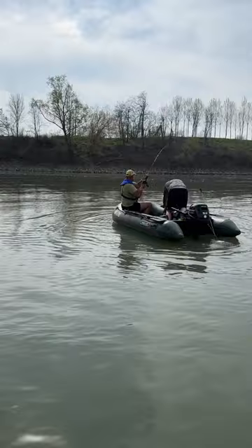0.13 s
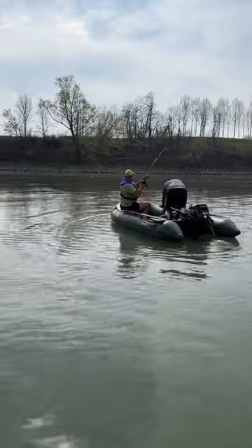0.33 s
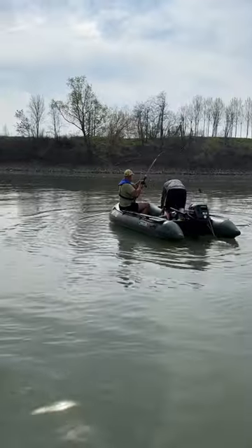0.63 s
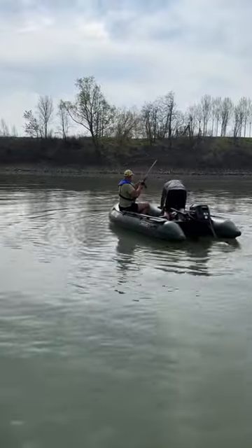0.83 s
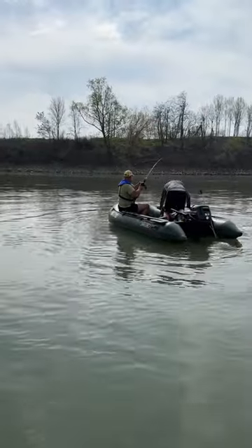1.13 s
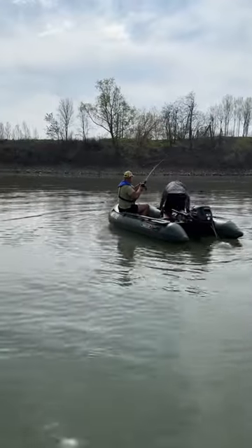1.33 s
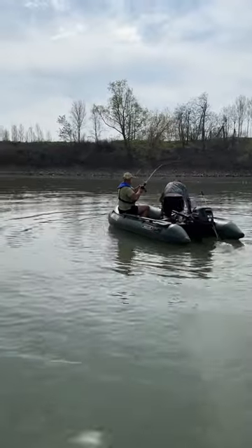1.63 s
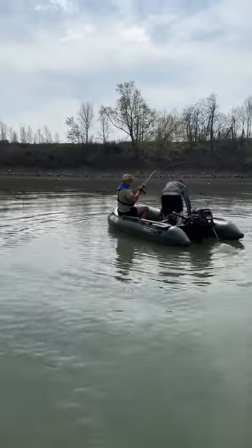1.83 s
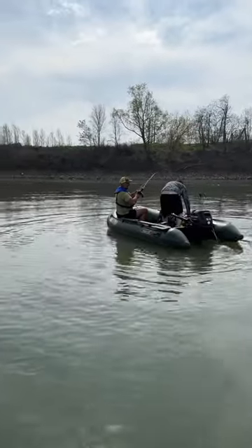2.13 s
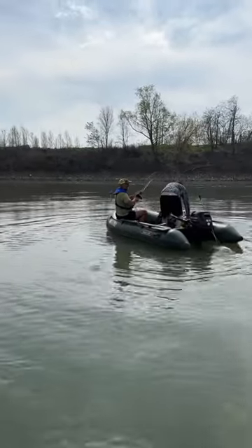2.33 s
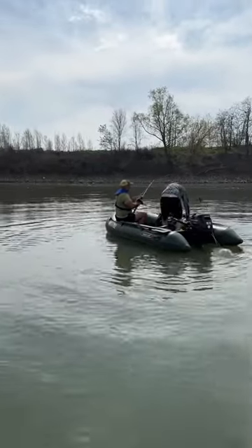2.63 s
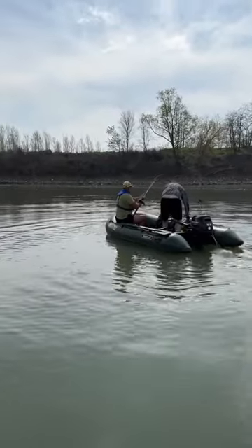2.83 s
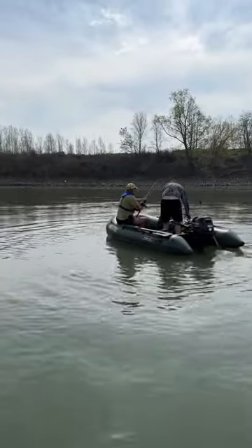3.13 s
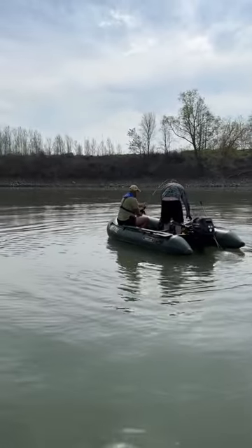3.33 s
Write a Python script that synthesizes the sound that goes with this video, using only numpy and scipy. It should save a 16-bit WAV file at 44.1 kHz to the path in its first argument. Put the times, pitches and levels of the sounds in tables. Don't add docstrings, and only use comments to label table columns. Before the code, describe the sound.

Steady puttering of an outboard engine on an open river, heard by a handheld camera's stereo microphone, with loose parts pinging, tiny drips and fizz, soft low wind puffs, and a single hard knock past midway.

```python
import sys
import numpy as np
from scipy import signal
from scipy.fft import rfft, irfft
from scipy.io import wavfile
from scipy.ndimage import uniform_filter1d

SR = 44100
rng = np.random.default_rng(int(sys.argv[2]) if len(sys.argv) > 2 else 0)


def store_wav(level_fs):
    pcm = np.round(np.clip(np.atleast_2d(level_fs), -1, 1) * 32767)
    wavfile.write(sys.argv[1], SR, pcm.T.astype(np.int16))


def voltage_ratio(level):
    return 10 ** (np.asarray(level, float) / 20)


N = 153027


def evened(x):
    return x / np.sqrt(np.mean(x ** 2) + 1e-20)


def read(points, hz):
    f, value = np.transpose(points)
    return np.interp(np.log(hz + 1), np.log(f + 1), value)


def over_time(points):
    return np.interp(np.arange(N) / SR, *np.transpose(points))


def coloured(x, points):
    n = x.shape[-1]
    return irfft(rfft(x) * voltage_ratio(read(points, np.fft.rfftfreq(n, 1 / SR))), n)


def drift(per_s):
    t = np.arange(0, N, 64) / SR
    f = np.geomspace(per_s / 12, per_s, num=24)[:, None]
    waves = np.sin(2 * np.pi * (f * t + rng.random(f.shape))) / np.sqrt(f)
    return np.interp(np.arange(N) / SR, t, evened(waves.sum(0)))


def ring(x, hz, width_hz):
    r = np.exp(-np.pi * width_hz / SR)
    return signal.lfilter([1, 0, -r], [1, -2 * r * np.cos(2 * np.pi * hz / SR), r * r], x)


def ring_twice(x, hz, width_hz):
    return evened(ring(ring(x, hz, width_hz), hz, width_hz))


def add(mix, s, sound):
    part = mix[round(s * SR):][:len(sound)]
    part += sound[:len(part)]


def turning(table, multiple=1):
    s, speed, db = np.transpose(table)
    t = np.arange(N) / SR
    return np.cumsum(np.interp(t, s, speed)) / SR / multiple, voltage_ratio(np.interp(t, s, db))


# (time [s], firings [per s], level [dB])
THUMP = [(0.0, 25.67, -1.4), (0.2, 25.22, -1.5), (0.4, 25.05, 0.2), (0.65, 25.28, 1.2), (0.9, 24.84, -0.3),
         (1.05, 25.13, 0.4), (1.2, 25.74, -0.2), (1.4, 25.23, 0.5), (1.65, 25.4, 0.3), (1.9, 24.72, -0.0),
         (2.1, 24.3, -0.1), (2.3, 24.51, 0.3), (2.55, 24.58, -0.4), (2.75, 24.47, -0.4),
         (2.95, 24.21, -1.4), (3.2, 24.1, -0.3), (3.47, 24.07, 1.4)]
# (multiple of the firing rate, level [dB rms])
THUMP_ORDERS = [(2, -40.5), (3, -33.5), (4, -37.5), (5, -47), (6, -48.5)]


def exhaust():
    pipe_hz, pipe_width_hz, idle_hz = 78, 110, 27
    turns, gain = turning(THUMP)
    turns = turns + 0.75 + 0.004 * drift(9)
    thump = 0
    for k, db in THUMP_ORDERS:
        lag = -0.2 - 2 * np.arctan((k * idle_hz - pipe_hz) / (pipe_width_hz / 2))
        lag += 3.6 * (k > 4.5)
        level = np.sqrt(2) * voltage_ratio(db + 0.9 * drift(6.5))
        thump = thump + level * np.cos(2 * np.pi * round(k) * turns - lag)
    return gain * thump


# (time [s], pitch of its 24th multiple [Hz], level [dB])
SHAFT = [(0.0, 812.4, 3), (0.11, 818.2, -0.5), (0.45, 815.3, -0.5), (0.77, 826.9, 0.5), (0.94, 815.1, 0),
         (1.54, 817.6, 0), (1.7, 827.9, 1.5), (2.02, 811.4, 0), (2.08, 818.3, 0.5), (2.17, 807.4, -1),
         (2.77, 830.7, 0), (3.28, 823.5, -0.5), (3.39, 827.7, 0), (3.47, 816.5, -0.5)]
WHINE_MULTIPLE = 24
# (multiple of the shaft speed, level [dB rms])
SHAFT_ORDERS = [(2, -46.5), (2.5, -49), (3, -51), (4, -54.5), (5, -49), (6, -51), (7, -56), (8, -54),
                (8.5, -55.5), (9, -47), (9.5, -53.5), (10, -54.5), (11, -55), (12, -55.5), (13, -62.5),
                (16, -50), (17, -58.5), (24, -53), (28.5, -63.5), (32, -54), (35, -60), (38.5, -60)]


def whine():
    turns, gain = turning(SHAFT, WHINE_MULTIPLE)
    tones = 0
    for k, db in SHAFT_ORDERS:
        level = np.sqrt(2) * voltage_ratio(db + 1.3 * drift(12))
        phase = 2 * np.pi * (round(2 * k) / 2 * turns + rng.random()) + 0.22 * drift(10)
        tones = tones + level * np.cos(phase)
    return gain * tones


def strokes():
    turns = turning(SHAFT, WHINE_MULTIPLE)[0] + 0.36
    puff = np.exp(-(turns % 1) / 0.43) * np.where(turns % 2 < 1, 1, 0.67)
    return uniform_filter1d(puff, size=450)


# (pitch [Hz], width [Hz], level [dB rms])
COWL = [(300.7, 66, -50), (427, 41, -52.5), (559.7, 56, -53.5), (746, 74, -52), (1004, 83, -54),
        (1063, 70, -55), (1157, 71, -55), (1685, 120, -59.5), (2067, 41, -63), (3115, 28, -65),
        (4480, 990, -63.5), (6220, 150, -61.5), (7440, 820, -60.5)]
# (time [s], level [dB])
SINGING = [(0, 4), (.85, 1), (1.1, -3), (1.55, -2.5), (1.8, -2), (2.25, -4), (2.4, 3), (3.47, -1)]
# (frequency [Hz], level [dB per Hz])
ROAR = [(40, -5.5), (130, -2), (500, -9), (1400, -16), (3500, -21), (5200, -29), (9500, -23),
        (16000, -30.5)]


def block():
    pressure = strokes()
    noise = rng.standard_normal((2, N)) * (1 + 0.68 * pressure / pressure.mean())
    cowl = sum(voltage_ratio(db + drift(4.95)) * ring_twice(noise[0], hz, 1.4 * width) for hz, width, db in COWL)
    cowl = cowl + voltage_ratio(-55 + over_time(SINGING)) * ring_twice(noise[0], 2236, 47)
    roar = voltage_ratio(-42.5 + 0.71 * drift(4.3)) * evened(coloured(noise[1], ROAR))
    return turning(SHAFT)[1] * cowl + roar


RATTLE_START = 0.64
# (time [s], level [dB])
CHUG_LEVEL = [(0, 0.5), (1.7, 1), (1.9, 3), (2.1, -1), (2.35, -3.5), (2.5, 3), (2.75, 2.5), (2.9, 0),
              (3.47, 0.5)]


def chug():
    turns = 2 * (turning(SHAFT, 2 * WHINE_MULTIPLE)[0] + RATTLE_START - 0.07)
    u = turns % 1
    strong = turns % 2 < 1
    later = np.tanh((np.arange(N) / SR - 1.6) / 0.3)
    phase = 32 * (turns + 0.1 * u * (1 - u) - 0.03 * u * strong)
    db = np.where(strong, 3 * later, -8 * (1 + later) / 2) + over_time(CHUG_LEVEL)
    level = 2 * voltage_ratio(-50 + db + 0.79 * drift(14)) * np.sqrt(np.sin(np.pi * u))
    return level * np.cos(2 * np.pi * phase + 0.5 * drift(20))


# (pitch [Hz], width [Hz], level [dB rms], delay [cycles])
RATTLE = [(1697, 50, -66.5, .4), (3147, 62, -65, 0.508), (3545, 100, -71.5, .45), (4360, 970, -63.5, .6),
          (2840, 95, -69.5, .45)]


def rattle():
    turns = turning(SHAFT, 2 * WHINE_MULTIPLE)[0] + RATTLE_START
    force = voltage_ratio(1.5 * drift(15))
    scrapes = np.hanning(800) * rng.standard_normal((len(RATTLE), 800))
    out = np.zeros(N)
    for (hz, width, db, delay), scrape in zip(RATTLE, scrapes):
        cycle = np.floor(turns - delay)
        hits = np.diff(cycle, prepend=cycle[0]) * force
        taps = signal.oaconvolve(hits, scrape)[:N]
        out += voltage_ratio(db) * ring_twice(taps, hz, 1.2 * width)
    return out


# (time [s], level [dB], pitch [Hz])
BEADS = [(0.0538, -39.5, 2240), (0.1301, -46, 2215), (0.172, -39, 2230), (0.2229, -43.5, 2250),
         (0.2828, -50, 2240), (0.3576, -54, 2180), (0.4095, -50, 2234), (0.5162, -45, 2244),
         (0.6125, -44, 2206), (0.6579, -40.5, 2205), (0.7262, -42, 2240), (0.7746, -40.5, 2186),
         (0.9378, -54, 2250), (1.045, -52, 2210), (1.1169, -47, 2220), (1.2426, -41.5, 2244),
         (1.2925, -51, 2230), (1.3598, -44, 2250), (1.4102, -53, 2170), (1.475, -39, 2240),
         (1.5279, -56, 2290), (1.5913, -43, 2230), (1.6232, -44, 2260), (1.6576, -39.5, 2215),
         (2.3493, -45, 2236), (2.4341, -40.5, 2226), (2.467, -50, 2245), (2.5882, -44, 2260),
              (2.6546, -43, 2253), (2.7678, -45.5, 2240), (2.8257, -58, 2170), (2.8826, -57, 2240),
              (3.0018, -52, 2230), (3.0517, -53, 2240), (3.116, -43.5, 2205), (3.1544, -45, 2297),
              (3.2906, -55, 2200), (3.4084, -45, 2300)]


def beads():
    length_s = 0.041
    out, t = np.zeros(N), np.arange(0, length_s, 1 / SR)
    swell = np.sin(np.pi * (t / length_s) ** 0.42) ** 2
    for s, db, hz in BEADS:
        add(out, s - 0.006, voltage_ratio(db - 2.5) * swell * np.sin(2 * np.pi * hz * t))
    return out


# (frequency [Hz], level [dB per Hz])
KNOCK = [(400, -25), (1000, 0), (1500, -4), (2500, -2), (4200, 2), (6500, -3), (10000, -15), (16000, -21)]
# (pitch [Hz], level [dB], time to fall 60 dB [s])
HULL = [(1450, -5, 0.04), (2300, 2, 0.057), (2490, -1, 0.07), (2780, -3.5, .06), (3360, 2, .08),
        (4310, -1.5, 0.08)]


def knock():
    out, t = np.zeros(N), np.arange(5000) / SR
    crack = voltage_ratio(-60 * np.maximum(t - 0.0037, 0) / 0.0093)
    tail = voltage_ratio(-5 - 60 * t / 0.11)
    blow = rng.standard_normal(5000) * np.minimum(t / 0.00071, 1) * (crack + tail)
    modes = sum(voltage_ratio(db - 60 * t / t60) * np.sin(2 * np.pi * hz * t) for hz, db, t60 in HULL)
    ringing = voltage_ratio(-10) * modes * np.minimum(t / 0.0019, 1)
    add(out, 2.0375, voltage_ratio(-27.5) * (coloured(blow, KNOCK) * 1.47 + ringing))
    return out


# (time [s], level [dB], pitch [Hz])
TICKS = [
    (0.161, -35, 4480),
    (0.945, -32.5, 8200),
    (1.7376, -31, 4660),
    (2.2403, -36.5, 7500),
    (2.566, -38.5, 7340),
    (2.829, -38, 4100),
    (2.9576, -33, 7470),
    (3.0025, -32, 4570),
    (3.041, -40, 7860),
         (.345, -39, 10480),
    (0.567, -32, 10000),
    (.636, -35.5, 9400),
    (1.05, -27.5, 11100),
    (1.3818, -28, 10770),
    (1.454, -35, 11100),
    (1.592, -36, 9400),
    (1.738, -31, 9250),
         (.064, -45, 7510), (.272, -48, 6280), (.707, -47, 6580), (1.05, -46, 6260), (1.117, -40, 7010),
          (1.199, -37, 7900), (1.288, -38, 4610), (1.381, -34.5, 6270), (1.591, -35, 6300),
          (2.305, -40, 7010), (2.694, -42, 4680), (3.166, -42, 7160), (3.258, -41, 6210)]
# (time [s], level [dB], pitch [Hz])
PLOPS = [
    (0.358, -43, 1220),
    (0.779, -31, 2230),
    (1.6197, -41, 1290),
    (2.9045, -30, 1200),
    (3.0196, -31, 2330),
    (3.1567, -29, 2354),
    (3.3966, -44, 1220),
]


def drops():
    out, t = np.zeros(N), np.arange(900) / SR
    ticks = TICKS
    for (s, db, hz), noise in zip(ticks, rng.standard_normal((len(ticks), 900))):
        spray = noise * np.minimum(t / 0.00046, 1) * np.exp(-t / 0.0036)
        hiss = evened(np.diff(spray, n=2, prepend=[0, 0]))
        burst = evened(ring(spray, hz, 0.12 * hz)) + 0.19 * hiss
        add(out, s, voltage_ratio(db - 0.2) * burst / abs(burst).max())
    fade = np.minimum(t / 0.00083, 1) * np.exp(-t / 0.0058)
    for s, db, hz in PLOPS:
        add(out, s, voltage_ratio(db - 6.5) * np.sin(2 * np.pi * hz * t * (1 + 9 * t)) * fade)
    return out


def fizz():
    size = voltage_ratio(3.45 * np.minimum(rng.exponential(1, N), 4)) * (rng.random(N) < 900 / SR)
    kind, out = rng.integers(0, 24, N), np.zeros(N)
    for k, hz in enumerate(np.geomspace(1500, 14000, num=24)):
        u = np.arange(0, 8, hz / SR)
        chirp = np.sin(2 * np.pi * u * (1 + 0.024 * u)) * u * np.exp(-u / 1.73)
        out += signal.oaconvolve(size * (kind == k), chirp)[:N]
    return voltage_ratio(-54.5) * evened(out)


# (time [s], level [dB])
GUSTS = [(.27, -5), (.71, 5), (.87, 5), (1.07, 6), (1.63, 10), (1.95, 4), (2.05, 8), (2.35, 2), (2.5, 10),
         (2.72, 8.5), (2.85, 3), (3.12, 7), (3.38, 4)]
# (frequency [Hz], level [dB per Hz])
WIND = [(25, -24), (60, 6), (110, 2), (170, -7), (260, -14), (600, -54)]


def wind():
    t = np.arange(N) / SR
    puffs = coloured(rng.standard_normal((2, N)), WIND)
    gusts = 1 + sum(voltage_ratio(db + 3.5) * np.exp(-((t - s) / 0.086) ** 2) for s, db in GUSTS)
    return voltage_ratio(-49.5) * gusts * evened(puffs + 0.5 * puffs[::-1])


# (frequency [Hz], phase [radians])
LEAD = [(340, -.1), (600, 1.5), (1120, .8), (4650, -.9), (5550, -6.2), (7800, -6.8), (10900, -9.3),
        (14900, -9.46), (16000, -10.2)]
# (frequency [Hz], phase [radians])
RIPPLE = [(900, 0), (1400, 1.06), (4000, 1.66), (4800, 0.32), (10000, 0)]
# (frequency [Hz], difference [dB])
LEAN = [(60, -0.5), (130, -2.5), (290, -6), (640, -7), (1410, 0), (3100, 3.5), (6820, -0.3), (11000, 0)]
# (frequency [Hz], likeness [0 to 1])
SAME = [(100, 0.99), (300, 0.72), (700, 0.6), (2000, 0.8), (4900, 0.76), (6500, 0.9), (9300, 0.92),
        (10500, 1)]


def ports(x, other=None):
    hz = np.fft.rfftfreq(N, 1 / SR)
    left = right = rfft(x)
    if other is not None:
        same = np.clip(read(SAME, hz), 0, 1)
        right = same * left + np.sqrt(1 - same ** 2) * rfft(other)
    reflection = read(RIPPLE, hz) * np.sin(2 * np.pi * hz * 0.0039)
    side = voltage_ratio(read(LEAN, hz) / 2) * np.exp(0.5j * (read(LEAD, hz) + reflection))
    return irfft(np.array([left * side, right / side]), N)


def scene():
    clear = ports(exhaust() + whine() + rattle() + chug() + beads() + drops() + knock())
    return clear + ports(block() + fizz(), block() + fizz()) + wind()


def top_cut(x):
    return signal.sosfilt(signal.butter(12, 17150, fs=SR, output="sos"), x)


def record(dry):
    low_pass = signal.firwin(401, 15780, window=("kaiser", 9), fs=SR)
    limited = signal.oaconvolve(dry, low_pass[None], "same")
    return top_cut(limited)


dry = scene()
out = record(dry)
store_wav(out)
```